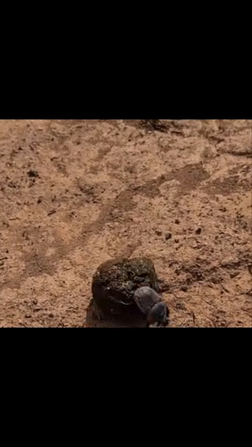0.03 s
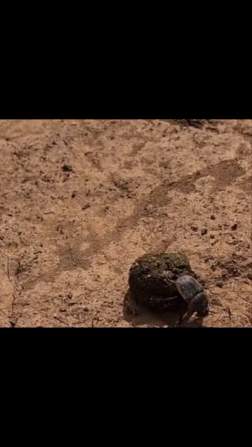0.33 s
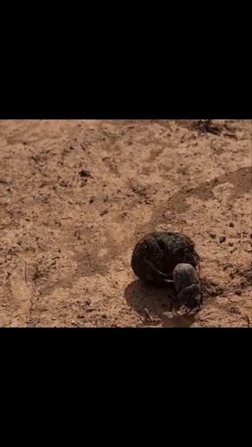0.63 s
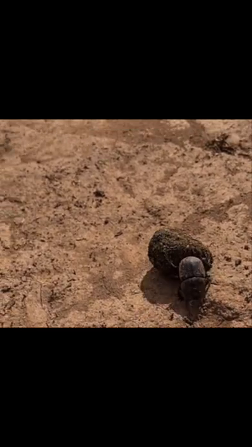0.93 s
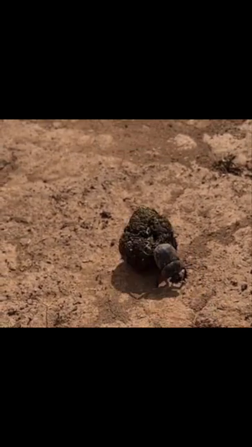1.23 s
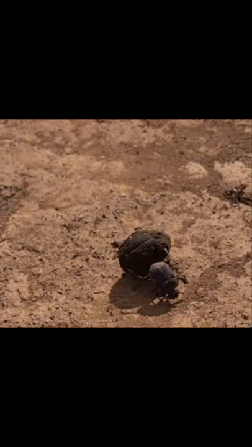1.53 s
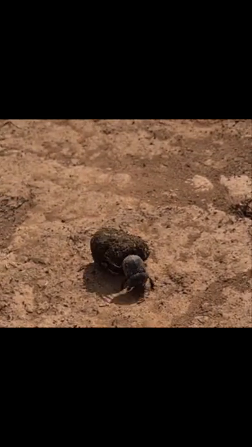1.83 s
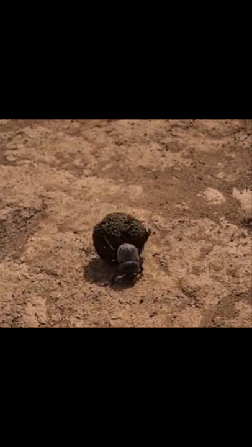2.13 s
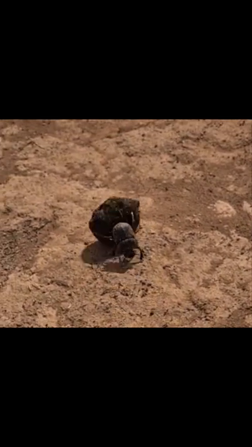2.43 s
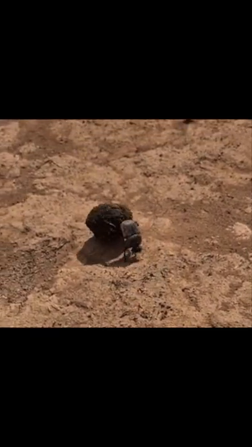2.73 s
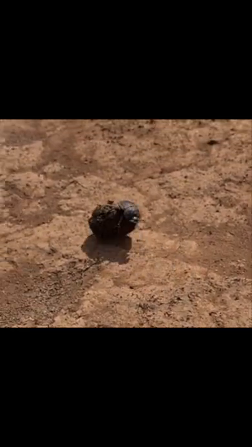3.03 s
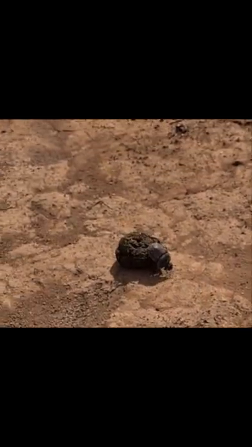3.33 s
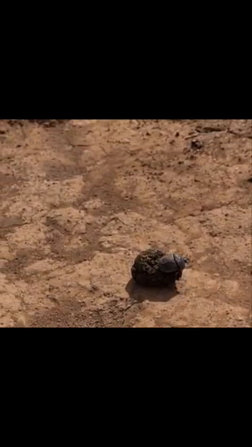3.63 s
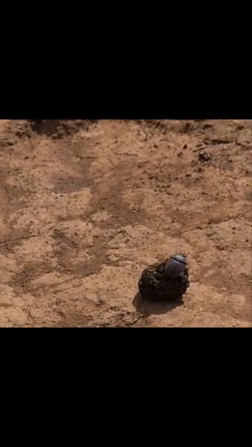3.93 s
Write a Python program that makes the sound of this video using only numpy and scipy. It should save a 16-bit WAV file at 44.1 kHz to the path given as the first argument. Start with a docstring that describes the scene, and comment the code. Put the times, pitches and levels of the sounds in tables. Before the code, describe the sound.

Wind buffets the microphone in low, uneven puffs, lulls from about 2.2 to 2.7 seconds, then rumbles and flutters hardest from 3.3 seconds to the end at 4. Faint high crickets pulse throughout over a soft hiss of air. A few tiny grit ticks come, mostly in the first second. Thin, distant bird chirps appear around 1.6 and 1.9 seconds, and more often after 3.

```python
"""Wind buffets two microphone ports low over dry, open ground. From the start, soft hissing air,
a thin hum, far bird calls and crickets chirping in runs of falling wing strokes lie behind the rumble.
Near 0.2 s come the first of a few ticks of grit and one dull bump. A far gust sighs around 1 s.
The wind lulls after 2.2 s, then buffets hardest from 3.3 s on, its small eddies fluttering."""
import sys
import numpy as np
from scipy import signal
from scipy.fft import rfft, irfft
from scipy.io import wavfile
from scipy.ndimage import uniform_filter1d, map_coordinates

SR = 44100
rng = np.random.default_rng(int(sys.argv[2]) if len(sys.argv) > 2 else 0)


def int16_out(signal):
    """Quantize to a 16-bit WAV file."""
    q = np.round(np.clip(np.atleast_2d(signal).T, -1, 1) * 32767)
    wavfile.write(sys.argv[1], SR, q.astype(np.int16))


N = 176400


def undb(db):
    """Decibels to gain."""
    return 10 ** (np.asarray(db) / 20)


def unit(x):
    """Scale to an rms of 1."""
    return x / np.sqrt(np.mean(x ** 2) + 1e-30)


def curve(rows, column=1):
    """One table column, linearly interpolated over time."""
    rows = np.array(rows)
    return np.interp(np.arange(N) / SR, rows[:, 0], rows[:, column])


def noise(spectrum, size=N):
    """Unit-rms noise shaped by rows of freq_hz, density_db."""
    hz, db = np.array(spectrum).T
    bins_hz = np.maximum(np.fft.rfftfreq(size, 1 / SR), 1)
    gain = undb(np.interp(np.log(bins_hz), np.log(hz), db))
    return unit(irfft(rfft(rng.standard_normal(size)) * gain, size))


def walk(rate_hz):
    """Smooth random drift, unit rms."""
    hold = int(SR / rate_hz)
    steps = np.repeat(rng.standard_normal(N // hold + 1), hold)
    return unit(uniform_filter1d(uniform_filter1d(steps, hold), hold)[:N])


def pan(left_over_right_db):
    """Constant-power stereo gains."""
    gains = np.array([undb(left_over_right_db / 2), undb(-left_over_right_db / 2)]).reshape(2, -1)
    return gains / np.sqrt(np.mean(gains ** 2, axis=0))


def add(out, start_s, sound):
    """Mix a sound in at start_s."""
    first = max(int(start_s * SR), 0)
    size = max(min(sound.shape[-1], N - first), 0)
    out[:, first:first + size] += sound[..., :size]


def scatter(x, echo_db, t60_s=0.33):
    """Ground and scrub return a short tail."""
    t = np.arange(SR // 2) / SR
    tail = rng.standard_normal((2, len(t))) * np.exp(-np.log(1000) * t / t60_s)
    tail /= np.sqrt(np.sum(tail ** 2, axis=1, keepdims=True))
    return x + undb(echo_db) * signal.fftconvolve(x, tail, axes=1)[:, :N]


def whistle(pitch_hz, skew=1):
    """A gliding tone that swells and fades; skew over 1 delays the peak."""
    envelope = np.sin(np.pi * np.linspace(0, 1, len(pitch_hz)) ** skew)
    return np.sin(2 * np.pi * np.cumsum(pitch_hz) / SR) * envelope


def eddies(spectrum, travel_samples, span_s=0.037, evenness=0.91):
    """Turbulence of nearly even strength, carried past at the pace of the wind."""
    still = signal.hilbert(noise(spectrum, size=2 * N))
    swirl = map_coordinates(still, [travel_samples], order=1, mode="mirror")
    span = int(span_s * SR)
    power = uniform_filter1d(uniform_filter1d(abs(swirl) ** 2, span), span)
    return unit(swirl.real / power ** (evenness / 2))


def wind(gain_db=-1.5, base_eddy_hz=60.55, flutter_db=-17.5, flutter_growth=0.56):
    """Each port meets its own eddies; fast ones sound higher, hard buffets flutter."""
    # buffets: peak_s, swell_s, left_db, right_db, eddy_hz
    buffets = [(0, 0.018, -58, -74, 61.5), (0.203, 0.019, -72, -50.5, 58.8),
               (0.29, 0.036, -81, -54.5, 56.2), (0.36, 0.012, -62, -45.5, 85),
               (0.411, 0.022, -49, -43, 55.1), (0.517, 0.016, -54, -44.5, 80.9),
               (0.588, 0.03, -61, -46.5, 69.5), (0.652, 0.022, -39, -36.5, 59.4),
               (0.694, 0.025, -39, -50, 61.4), (0.799, 0.059, -66, -52, 53.7),
               (0.939, 0.028, -64, -49, 55.54), (1.118, 0.019, -52.5, -39.5, 75.6),
               (1.143, 0.01, -50, -47.5, 108.8), (1.168, 0.017, -41, -52, 68.3),
               (1.236, 0.031, -47.5, -56, 51.34), (1.335, 0.032, -49, -65, 63.55),
               (1.383, 0.011, -65, -59, 96.2), (1.424, 0.021, -47, -43, 61.55),
               (1.539, 0.047, -50.5, -51, 43.72), (1.708, 0.031, -51, -82, 57.8),
               (1.822, 0.023, -39, -58, 57.8), (1.874, 0.018, -36, -36, 63.5),
               (1.986, 0.025, -40, -44, 56.5), (2.061, 0.041, -45, -52, 58),
               (2.184, 0.041, -65.5, -49.5, 52.02), (2.732, 0.032, -67, -52.5, 50.6),
               (2.847, 0.037, -49.5, -53.5, 69.1), (2.956, 0.033, -59.5, -48, 50.4),
               (3.227, 0.042, -62, -51, 51.88), (3.35, 0.019, -38.5, -35.5, 63.7),
               (3.373, 0.018, -31, -61, 68.9), (3.429, 0.011, -22, -29.5, 74.96),
               (3.465, 0.026, -49, -36.5, 57.88), (3.539, 0.0093, -52.5, -35.5, 58.58),
               (3.635, 0.035, -34.5, -37.5, 62.86), (3.702, 0.016, -29, -35.5, 68.7),
               (3.815, 0.039, -45.5, -33, 57.77), (3.871, 0.012, -26.5, -22, 75.24),
               (3.919, 0.012, -21, -64, 76.4), (3.956, 0.02, -22, -26, 65.75)]
    # large eddies at base_eddy_hz: freq_hz, density_db
    rumble_spectrum = [(12, -19.5), (25, -5), (45, 1.5), (68, 2.5), (90, -6.5), (115, -21), (150, -36),
                       (220, -54), (330, -75), (700, -105)]
    # small eddies at base_eddy_hz: freq_hz, density_db
    flutter_spectrum = [(50, -30), (115, 11.5), (155, -3), (205, -8.5), (260, -23.5), (400, -52),
                        (800, -100)]
    left_breeze_db, right_breeze_db = -76.5, -65
    ports, t = [], np.arange(N) / SR
    peak_s, swell_s, left_db, right_db, _ = np.array(buffets).T
    swells = np.exp(-((t - peak_s[:, None]) / swell_s[:, None]) ** 2)
    travel_samples = np.cumsum(curve(buffets, column=4) / base_eddy_hz)
    for buffet_db, breeze_db in ((left_db, left_breeze_db), (right_db, right_breeze_db)):
        push = np.sqrt(undb(buffet_db) ** 2 @ swells + undb(breeze_db) ** 2)
        flutter_gain = undb(flutter_db) * (push / push.max()) ** flutter_growth
        flutter = flutter_gain * eddies(flutter_spectrum, travel_samples)
        ports.append(push * (eddies(rumble_spectrum, travel_samples) + flutter))
    return undb(gain_db) * np.array(ports)


def air(shared_power=0.28):
    """A soft far rush, partly common to both sides, under a fine hiss."""
    # far rush: freq_hz, density_db
    rush_spectrum = [(30, 6), (180, -2.5), (275, 0), (370, -5.5), (560, -6.5), (760, -15), (900, -12.5),
                     (1020, -15), (1450, -15.5), (1570, -26), (1720, -17), (3000, -26.5), (6000, -41)]
    # rush envelope: time_s, level_db
    rush_levels = [(0, -75), (.11, -79), (.18, -73.5), (.55, -75), (1.0, -71), (1.5, -74.5), (2.2, -76.5),
                   (3.0, -76.5), (3.5, -76), (4, -77.5)]
    # fine hiss: freq_hz, density_db
    hiss_spectrum = [(500, -1), (2000, -3), (3400, 1), (4300, -2.5), (5500, -2), (6300, 2.5), (7200, 1),
                     (8000, -14.5), (10000, -14.5), (12000, -8.5), (15500, -9)]
    # hiss envelope: time_s, level_db
    hiss_levels = [(0, -85.5), (.1, -83), (.15, -81), (1.0, -81), (1.6, -81), (2.7, -82.5), (4, -82.5)]
    common = noise(rush_spectrum)
    sides = np.array([noise(rush_spectrum), noise(rush_spectrum)])
    rush = np.sqrt(shared_power) * common + np.sqrt(1 - shared_power) * sides
    hiss = np.array([noise(hiss_spectrum), noise(hiss_spectrum)]) * pan(0.1)
    rush_db = curve(rush_levels) + 0.8 * walk(rate_hz=15)
    hiss_db = curve(hiss_levels) + 0.4 * walk(rate_hz=4)
    return rush * undb(rush_db) + hiss * undb(hiss_db)


def hum(level_db=-96, waver_db=2.2):
    """A thin, airy hum wavers in the distance."""
    # narrow noise band: freq_hz, density_db
    spectrum = [(1000, -30), (1140, 0), (1280, -33)]
    return noise(spectrum) * undb(level_db + waver_db * walk(rate_hz=6.3))


def birds(gain_db=-5, base_rasp=0.0063, rasp_per_octave=0.092):
    """Thin, far pips and slurs; fast pitch jitter makes the wide slurs raspy."""
    # notes: start_s, length_s, start_hz, middle_hz, end_hz, level_db
    notes = [(0,0.051,1960,2450,2760,-79), (1.597,0.028,4650,4420,4100,-73.5),
             (1.942,0.046,4807,4430,4480,-70.5), (2.604,.032,3920,3947,3880,-79.5),
             (2.943,0.034,3965,3907,3904,-79), (3.104,0.067,3693,3002,2020,-82.5),
             (3.249,0.055,3920,3920,3870,-75), (3.337,0.08,1992,2210,2380,-74.5),
             (3.389,0.045,3620,3354,2520,-72.5), (3.42,0.028,4700,3886,2900,-78),
             (3.422,.06,3700,3120,2100,-78), (3.471,0.032,2246,2488,2900,-75),
             (3.617,0.026,3933,3895,3860,-69.5), (3.935,0.038,3837,3850,3838,-78)]
    out, jitter = np.zeros((2, N)), walk(rate_hz=1500)
    for start_s, length_s, start_hz, middle_hz, end_hz, level_db in notes:
        progress = np.linspace(0, 1, int(length_s * SR))
        pitch_hz = np.polyval(np.polyfit([0, .5, 1], [start_hz, middle_hz, end_hz], 2), progress)
        depth = base_rasp + rasp_per_octave * abs(np.log2(end_hz / start_hz))
        rasp = depth * np.roll(jitter, -int(start_s * SR))[:len(progress)]
        add(out, start_s, whistle(pitch_hz * (1 + rasp), skew=1.5) * undb(level_db + gain_db))
    return scatter(out, echo_db=-2)


def cricket_chorus(centre_hz=4905, width_hz=150, level_db=-88.5, throb_db=2.6):
    """Far crickets blur into one throbbing band."""
    band = np.exp(-.5 * ((np.fft.rfftfreq(N, 1 / SR) - centre_hz) / width_hz) ** 2)
    blur = unit(irfft(rfft(rng.standard_normal((2, N))) * band, N))
    return blur * undb(level_db + throb_db * walk(rate_hz=45))


def crickets(strokes=3, period_s=0.032, gain_db=-5):
    """Each chirp is a run of wing strokes, each stroke falling in pitch."""
    # chirps: first_peak_s, level_db, cricket
    chirps = [(.03, -75.5, "near"), (.135, -78.5, "middle"), (.256, -71, "near"), (.362, -78, "middle"),
              (.485, -71.5, "near"), (.714, -70, "near"), (.873, -74, "middle"), (.96, -72.5, "near"),
              (1.08, -72, "middle"), (1.199, -74, "near"), (1.307, -73.5, "middle"), (1.43, -72.5, "near"),
              (1.545, -76, "middle"), (1.68, -72, "near"), (1.945, -73, "near"), (2.05, -79.5, "middle"),
              (2.18, -72.5, "near"), (2.42, -77.5, "far"), (2.683, -83, "middle"), (2.773, -77.5, "far"),
              (2.786, -71, "near"), (2.907, -81.5, "middle"), (3.025, -73, "near"),
              (3.155, -77.5, "middle"), (3.259, -70.5, "near"), (3.308, -77, "far"),
              (3.405, -76.5, "middle"), (3.532, -71.5, "near"), (3.588, -79, "far"),
              (3.657, -79.5, "middle"), (3.756, -72.5, "near"), (3.862, -77, "middle"),
              (3.992, -73.5, "near")]
    # stroke by cricket: pitch_hz, fall_hz, length_s
    voices = {"near": (4850, 600, 0.025), "middle": (5040, 190, 0.027), "far": (5230, 300, 0.019)}
    out = np.zeros((2, N))
    for first_peak_s, level_db, cricket in chirps:
        pitch_hz, fall_hz, length_s = voices[cricket]
        position = np.linspace(-.5, .5, int(length_s * SR))
        for k in range(strokes):
            offset_db, detune_hz, pan_db = rng.normal([0, 0, 1.5], [0.99, 35, 2.2])
            stroke = whistle(pitch_hz + detune_hz - fall_hz * position) * np.cos(np.pi * position)
            start_s = first_peak_s + k * period_s - length_s / 2
            add(out, start_s, stroke * undb(level_db + gain_db + offset_db) * pan(pan_db))
    return scatter(out, echo_db=-3)


def grit(decay_s=0.003, width_octaves=0.6, gain_db=-8.5, size=1024):
    """Dry grains click on hard ground."""
    # ticks: start_s, level_db, centre_hz
    ticks = [(.192, -60, 1700), (.192, -66, 7500), (0.591, -67, 5500), (0.7398, -67, 13000),
             (1.992, -79, 7400), (2.2478, -69.5, 11980), (3.0872, -70, 11410)]
    out, t = np.zeros((2, N)), np.arange(size) / SR
    bins_hz = np.maximum(np.fft.rfftfreq(size, 1 / SR), 1)
    for start_s, level_db, centre_hz in ticks:
        band = np.exp(-.5 * (np.log2(bins_hz / centre_hz) / width_octaves) ** 2)
        crack = unit(irfft(rfft(rng.standard_normal((2, size))) * band, size))
        add(out, start_s, crack * np.exp(-t / decay_s) * undb(level_db + gain_db))
    return out


def bump(start_s=0.207, rise_s=0.015, level_db=-67.5, pan_db=-13):
    """One soft, dull bump, mostly at the right port."""
    # low thud: freq_hz, density_db
    spectrum = [(120, -24), (235, 8), (400, -15), (900, -34), (2000, -70)]
    out, age = np.zeros((2, N)), np.arange(N) / SR / rise_s
    envelope = age * np.exp(1 - age)
    add(out, start_s, noise(spectrum) * envelope * undb(level_db) * pan(pan_db))
    return out


def far_gust(peak_s=0.99, swell_s=0.29, level_db=-87.5):
    """A gust sighs hollowly over the ground some way off."""
    # sigh: freq_hz, density_db
    spectrum = [(600, -39), (1100, 6), (1350, 0), (2200, -41)]
    t = np.arange(N) / SR
    swell = np.exp(-((t - peak_s) / swell_s) ** 2)
    return np.array([noise(spectrum), noise(spectrum)]) * undb(level_db) * swell


def scene():
    """Wind in front, open country behind."""
    return wind() + air() + hum() + birds() + cricket_chorus() + crickets() + grit() + bump() + far_gust()


def record(dry):
    """The recorder cuts the top of the treble."""
    cutoff_hz = 15650
    return signal.sosfilt(signal.ellip(10, .1, 70, cutoff_hz, fs=SR, output="sos"), dry)


dry = scene()
out = record(dry)
int16_out(out)
```